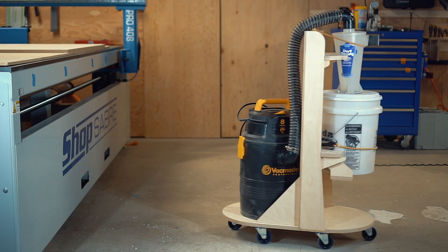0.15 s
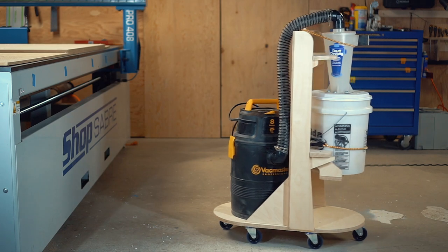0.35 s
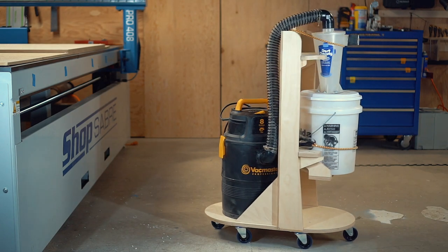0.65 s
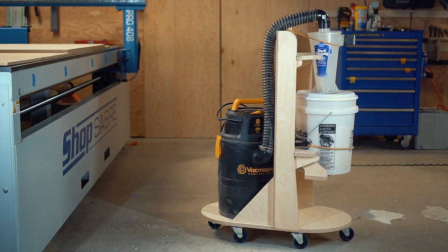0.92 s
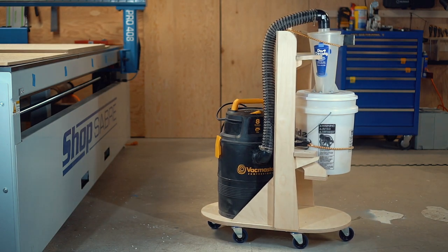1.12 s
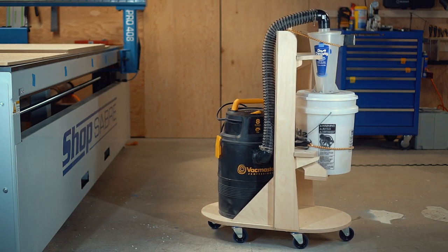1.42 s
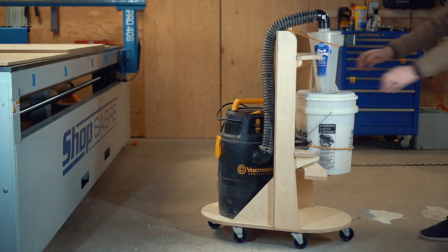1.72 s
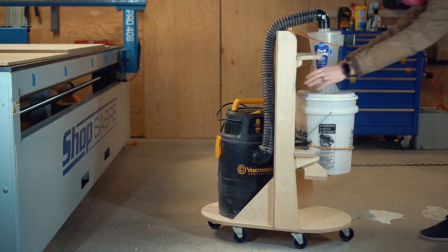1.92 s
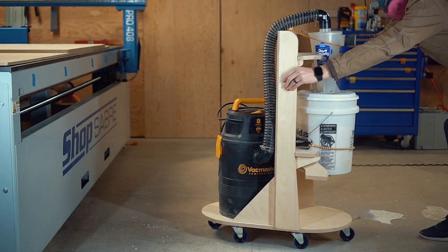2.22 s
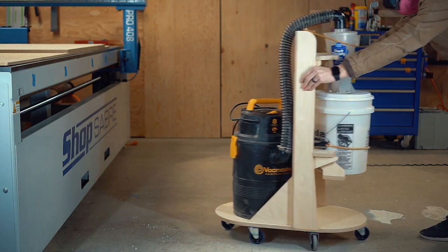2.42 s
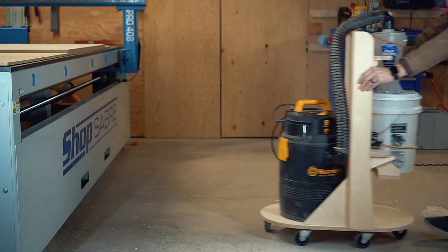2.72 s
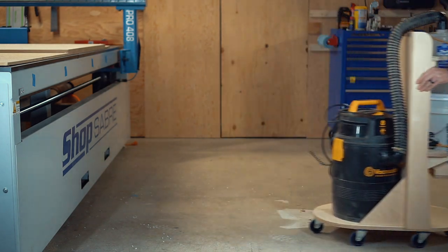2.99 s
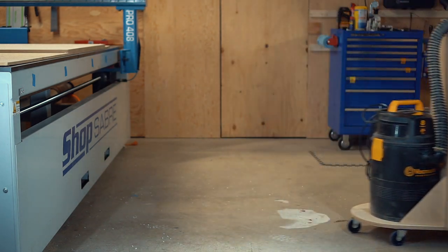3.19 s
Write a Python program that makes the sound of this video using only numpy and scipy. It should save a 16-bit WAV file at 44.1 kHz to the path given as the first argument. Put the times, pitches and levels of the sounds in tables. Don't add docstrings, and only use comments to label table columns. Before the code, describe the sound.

Hard cart wheels chatter on concrete, fall quiet, then jolt, clatter and rumble off

```python
import sys
import numpy as np
from scipy import signal
from scipy.fft import rfft, irfft, next_fast_len
from scipy.io import wavfile

SR = 44100
rng = np.random.default_rng(int(sys.argv[2]) if len(sys.argv) > 2 else 0)


def generate_wav(sig):
    pcm = np.round(np.clip(np.atleast_2d(sig).T, -1, 1) * 32767).astype(np.int16)
    wavfile.write(sys.argv[1], SR, pcm)


def gain_from_db(level_db):
    decades = np.asarray(level_db, float) / 20
    return 10 ** decades


N = 147735

# time in seconds, deck level in dB, then fork chatter and wheel scrub
# in dB against the deck.
COASTING = [
    (0, -35.5, -12, -48),
    (.07, -41, -9, -48),
    (.16, -39.5, -11, -48),
    (.33, -55, -7.5, -45),
    (.62, -51.5, -8.5, -33),
    (.74, -51, -2, -36),
    (1.0, -52, -4.5, -42),
    (2.12, -58, -6.5, -45),
    (2.18, -50, -8, -30),
]
TUGGED = [
    (2.24, -49, -18, -16),
    (2.27, -34.5, -8, -46),
    (2.48, -37, -7.5, -29),
    (2.495, -30, 2.5, -17.5),
    (2.6, -27.5, -5, -16.5),
    (2.63, -21, -6, -19),
    (2.69, -21.5, -5.5, -20),
    (2.72, -28.5, -1, -21),
    (2.84, -27, -3.5, -27),
]
ROLLING_AWAY = [
    (2.865, -24, -12, -37),
    (2.883, -22, -8.5, -37),
    (2.895, -21, -5.5, -26),
    (2.97, -22, -1, -24),
    (3.04, -21.5, -5.5, -41),
    (3.13, -23.5, -2.5, -35),
    (3.2, -29, 4.5, -28.5),
    (3.26, -25, 1, -34.5),
    (3.35, -30.5, 3.5, -22),
]
# time in seconds, fork level in dB, deck and crack levels in dB against the
CASTER_JOLTS = [(0.096, -41, -4, -14, 0.4), (0.101, -36, -7, -30, 0.12), (0.698, -34, -5.5, -6.5, 0.7),
                (0.7054, -36, -4, -30, 0.18), (2.2435, -42.5, 6, -40, 0.2), (2.2632, -31.5, 7.5, -36, 0.24),
                (2.3012, -35.5, 5, -30, .1), (2.3222, -32, 3, -10, 0.3), (2.3395, -35.5, 5, -20, 0.1),
                (2.411, -32, -3, -2, .9), (2.429, -40, 5, -6, .6), (2.4895, -24.5, -3, -19, 0.37),
                (2.521, -26, -5, 0, .4), (2.5724, -27, 7.5, -3, 0.2), (2.586, -27, 0, -20, 0.2),
                (2.6117, -22, -2, -10, 0.2), (2.6654, -12, -2, -7, 0.28), (2.892, -12.5, -14, -14, 0.54),
                (2.9272, -18, -10, -15, 0.34), (2.966, -10, -10, -19, 0.62), (3.0712, -21, -12, -8, 0.3),
                (3.0867, -15, -5.5, -24, 0.43), (3.1525, -20.5, 0, -20, 0.2),
                (3.1915, -12, -4.5, -24, 0.45), (3.2275, -7, -14, -30, .7), (3.244, -20, -8, -25, .4),
                (3.3179, -20.5, -13, -30, 0.13)]
# time in seconds, peak in dB, pitch in Hz,
# # 60 dB decay in seconds.
CART_RINGS = [(0.096, -50, 6900, .03), (.099, -40, 1156, 0.085), (.1, -45, 1770, 0.037),
              (.099, -46, 2330, .04), (.096, -53, 4900, .03), (.112, -48, 3570, 0.036),
              (.703, -34, 340, 0.12), (1.12, -54.5, 1010, 5.5), (.697, -42, 6770, 0.033),
              (.699, -48, 3570, 0.08), (.714, -44, 3575, .06), (.703, -45, 2280, .05),
              (.704, -43, 1300, .05), (.7, -46, 2880, 0.046), (.82, -61, 3570, .15), (.82, -56, 2500, .05),
              (0.721, -44, 2500, 0.061), (1.713, -44, 9900, .02), (2.26, -39.5, 2580, 0.07),
              (2.279, -43.5, 2570, 0.11), (2.302, -29, 746, 0.068), (2.332, -41, 2570, .1),
              (2.358, -44, 2560, .1), (2.383, -44, 2540, .1), (2.433, -36, 1150, .06),
              (2.52, -42, 12900, .03), (3.11, -24, 440, .15), (2.313, -54, 7300, .02),
              (2.32, -49, 4050, 0.027), (2.412, -45, 3750, .04), (2.429, -46, 4700, .012),
              (2.261, -19.5, 398, 0.035), (2.322, -37, 2400, 0.053), (2.41, -40, 7590, .035),
              (2.178, -34.5, 558, 0.16), (2.493, -32.5, 6050, 0.052), (2.492, -28, 2330, .06),
              (2.562, -38, 6050, .05), (2.586, -41, 6050, .08), (2.663, -39, 6000, .04),
              (2.493, -36, 7590, 0.063), (2.519, -31.5, 6050, 0.043), (2.63, -23, 722.6, 0.28),
              (2.663, -19, 444.3, 0.19), (2.868, -16, 325.6, 0.31), (2.892, -29, 7600, 0.02),
              (2.891, -31, 8230, 0.019), (2.983, -28, 3750, 0.035), (3.157, -40, 7750, .04),
              (3.189, -41, 7600, .03), (3.191, -19, 2390, 0.039), (3.226, -14.5, 2530, 0.03),
              (3.315, -25, 1540, 0.043)]
# time in seconds, peak in dB.
HANDLE_SHAKES = [(2.52, -41), (2.572, -35), (2.615, -32), (2.638, -34), (2.678, -35), (2.854, -49),
                 (2.886, -37), (2.926, -40), (2.95, -42), (3.014, -50), (3.08, -49), (3.094, -48),
                 (3.109, -40), (3.148, -45), (3.158, -46), (3.174, -42), (3.194, -39), (3.212, -48),
                 (3.24, -50), (3.28, -49.5), (3.324, -47)]

# centre in Hz, width in Hz, level in dB.
DECK_MODES = [(307.5, 36.7, -1.5), (348.7, 34.2, 2), (387, 84.5, -2.5), (439, 26.4, 1), (482.6, 19, -1),
              (540.7, 33.6, -2), (622, 70.5, -3.5), (735, 69, -3), (900, 97, -12.5)]
# centre in Hz, width in Hz, level in dB.
FORK_MODES = [(1030, 118, 4.5), (1318, 179, 2), (1570, 187, 2), (1850, 143, 0), (1970, 200, -2),
              (2414, 606, -6), (3065, 370, -8.5), (3740, 770, -16), (4890, 700, -18)]
# centre in Hz, width in Hz, level in dB.
RACE_MODES = [(3680, 430, -2.5), (6050, 200, -3), (10500, 700, -10)]
# centre in Hz, width in Hz, level in dB.
HANDLE_MODES = [(7600, 330, -6), (10200, 500, 0.5), (11200, 600, -4), (12900, 400, -14), (14900, 600, -11)]
# centre in Hz, width in Hz, rms level in dB.
HUM_BANDS = [(116.45, 6.4, -51)]

# frequency in Hz, density in dB per Hz.
SCRUB_COLOUR = [(1760, -41), (3000, -1.5), (4070, 6.5), (5150, -3), (5950, 4), (8800, -5), (10900, -6),
                (12900, -11), (13800, -18), (15700, -24)]
# frequency in Hz, density in dB per Hz.
SWISH_COLOUR = [(1500, -0.5), (3500, -4), (5500, -0.5), (7000, -2.5), (9000, -9), (12500, -8.5),
                (15500, -16)]
# frequency in Hz, density in dB per Hz.
AIR_COLOUR = [(45, -18.5), (85, -4), (140, -4), (285, -10.5), (600, -18), (1500, -27.5), (3500, -36.5),
              (15700, -44.5)]
# frequency in Hz, likeness from 0 to 1.
SIDES_ALIKE = [(60, 1), (250, .99), (500, .95), (1000, 0.6), (2000, 0.36), (4000, 0.1), (8000, 0.36),
               (14000, 0.1)]
# frequency in Hz, left minus right in dB.
CART_LEAN = [(250, -8), (500, 56), (2000, 16), (4000, 6), (8000, 2.5), (12000, 14)]

GRIT_PER_S, GRIT_SPREAD_DB = 1500, 1.5
BUMP_DB, BUMP_PER_S = 0.5, 23
JOLT_S, THUD_S, CRACK_S = .004, .006, .004
STRIKE = 7.5
RING_RISE_S, RING_ROUGH = .001, 0.32
RACE_DB = -8.5
HANDLE_S, HANDLE_DB = 0.0076, 6
SWISH_S, SWISH_RISE_S, SWISH_FALL_S, SWISH_DB = 1.726, 0.092, 0.16, -51
SHOP_T60_S, WALL_CUT_HZ, SHOP_DB = .45, 7000, -14
AIR_DB = -45
FAN_HZ, FAN_DB, FAN_FADE_DB_PER_S = 57.6, -45.5, 1
DUCK_S, DUCK_RAMP_S, DUCK_DB = 2.67, 0.071, -1.5


def rms_one(x):
    return x / np.sqrt(np.mean(x ** 2) + 1e-20)


def at_hz(points, hz):
    table_hz, values = np.transpose(points)
    return np.interp(np.log(hz), np.log(table_hz), values)


def drift(rate):
    r = np.exp(-80 * np.pi * rate / SR)
    noise = rng.standard_normal(N // 40 + 2002)
    slow = rms_one(signal.lfilter([1], [1, -2 * r, r * r], noise)[2000:])
    return np.interp(np.arange(N) / 40, np.arange(len(slow)), slow)


def butter(x, order, hz, kind="low"):
    return signal.sosfilt(signal.butter(order, hz, kind, fs=SR, output="sos"), x)


def resonate(x, hz, width_hz):
    r = np.exp(-np.pi * width_hz / SR)
    feedback = [1, -2 * r * np.cos(2 * np.pi * hz / SR), r * r]
    return signal.lfilter([(1 - r * r) / 2, 0, (r * r - 1) / 2], feedback, x + 1e-18)


def body(x, modes):
    return sum((-1) ** k * gain_from_db(db) * resonate(x, hz, w) for k, (hz, w, db) in enumerate(modes))


def stereo(mid, side, colour, lean):
    hz = np.maximum(np.arange(N // 2 + 1) * SR / N, 10)
    alike = np.clip(at_hz(SIDES_ALIKE, hz), 0, 1)
    pan_db = lean * at_hz(CART_LEAN, hz) / 2
    m = rfft(mid) * np.sqrt(1 + alike)
    s = rfft(side) * np.sqrt(1 - alike)
    sides = np.array([(m + s) * gain_from_db(pan_db), (m - s) * gain_from_db(-pan_db)])
    return irfft(gain_from_db(at_hz(colour, hz)) * sides, N)


def burst(s, db, fade_s):
    starts = np.zeros(N)
    starts[(np.asarray(s) * SR).astype(int)] = gain_from_db(db)
    return signal.lfilter([1], [1, -np.exp(-1 / (fade_s * SR))], starts + 1e-18)


def grit(share):
    sizes = gain_from_db(GRIT_SPREAD_DB * np.minimum(rng.exponential(1, N), 5)) * rng.choice([-1, 1], N)
    knocks = sizes * (rng.random(N) < share * GRIT_PER_S / SR)
    return rms_one(knocks) * gain_from_db(BUMP_DB * drift(BUMP_PER_S))


def rolling():
    s, *levels = np.transpose(list(COASTING) + list(TUGGED) + list(ROLLING_AWAY))
    load, chatter, scrub = (np.interp(np.arange(N) / SR, s, level) for level in levels)
    deck = rms_one(butter(body(grit(.6), DECK_MODES), 2, 260, "high"))
    fork = rms_one(butter(body(grit(.9), FORK_MODES), 2, 5200))
    flicker = gain_from_db(2.0 * drift(76))
    wheels = rms_one(stereo(grit(7.3), grit(2.0), SCRUB_COLOUR, lean=0.63)) * flicker
    races = gain_from_db(RACE_DB + 5.4 * drift(27)) * rms_one(body(grit(0.31), RACE_MODES))
    cart = gain_from_db(load - 1.5) * deck + gain_from_db(load + chatter - 2.5) * fork
    return cart, gain_from_db(load + scrub + 4.5) * (wheels + races)


def jolts():
    s, db, deck_db, crack_db, hard = np.transpose(CASTER_JOLTS)
    white = rng.standard_normal((4, N))
    white[:2, (s * SR).astype(int)] = -STRIKE
    hardness = np.clip(np.interp(np.arange(N) / SR, s, hard), 0, 1)
    contacts = white[0] - np.roll(white[0], 1) * hardness
    fork = butter(body(contacts * burst(s, db + 10.5, JOLT_S), FORK_MODES), 2, 6500)
    deck = body(white[1] * burst(s, db + deck_db + 19.5, THUD_S), DECK_MODES)
    crack = burst(s, db + crack_db - 8.0, CRACK_S)
    return fork + deck, stereo(white[2] * crack, white[3] * crack, SCRUB_COLOUR, lean=0.77)


def ticks():
    out, t = np.zeros(N + SR), np.arange(SR // 4) / SR
    chances = rng.uniform(0.53, 1, (len(CART_RINGS), 2))
    for (s, db, hz, t60), (apart, turn) in zip(CART_RINGS, chances):
        second_hz = hz * (1 + 0.019 * apart)
        pair = np.sin(2 * np.pi * hz * t) + 0.2 * np.sin(2 * np.pi * (second_hz * t + turn))
        decay = gain_from_db(db - 60 * t / t60) * (1 - np.exp(-t / RING_RISE_S))
        start = int(s * SR)
        out[start:start + len(t)] += decay * pair
    return out[:N] * (1 + RING_ROUGH * drift(87))


def handle():
    s, db = np.transpose(HANDLE_SHAKES)
    buzz = body(grit(3.0) * burst(s, db + HANDLE_DB, HANDLE_S), HANDLE_MODES)
    return buzz * gain_from_db(np.array([[1.7], [-1.7]]))


def swish():
    t = np.arange(N) / SR - SWISH_S
    swell = np.exp(np.where(t < 0, t / SWISH_RISE_S, -t / SWISH_FALL_S)) * gain_from_db(1.2 * drift(25))
    cloth = rms_one(stereo(*rng.standard_normal((2, N)), SWISH_COLOUR, lean=0))
    return gain_from_db(SWISH_DB) * swell * cloth


def shop(x):
    size = next_fast_len(N + SR)
    w = 2 * np.pi * np.arange(size // 2 + 1) / size
    dull = np.exp(-2 * np.pi * WALL_CUT_HZ / SR)
    wall = (1 - dull) / (1 - dull * np.exp(-1j * w))
    out = np.zeros((2, len(w)), complex)
    for k, lag in enumerate((rng.uniform(.015, .05, size=16) * SR).astype(int)):
        loop = gain_from_db(-60 * lag / SR / SHOP_T60_S) * wall * np.exp(-1j * w * lag)
        out[k % 2] += loop / (1 - loop) * (-1) ** (k // 2)
    hz = np.maximum(w * SR / (2 * np.pi), 10)
    apart = np.sqrt(np.clip(1 - at_hz(SIDES_ALIKE, hz), 0, 1)) * 1.34
    mid, side = (out[0] + out[1]) / 2, (out[0] - out[1]) / 2 * apart
    return irfft(rfft(x, size) * np.array([mid + side, mid - side]), size)[:, :N]


def air():
    noise = rms_one(stereo(*rng.standard_normal((2, N)), AIR_COLOUR, lean=0.037))
    noise = noise * gain_from_db(AIR_DB + 0.18 * drift(9.2))
    fan_level = gain_from_db(FAN_DB - FAN_FADE_DB_PER_S * np.arange(N) / SR + 2.0 * drift(2.0))
    fan = fan_level * np.sin(2 * np.pi * np.cumsum(FAN_HZ + 1.26 * drift(3)) / SR)
    hum = np.zeros(N)
    for hz, width_hz, db in HUM_BANDS:
        narrow = resonate(resonate(rng.standard_normal(2 * N), hz, width_hz), hz, width_hz)
        hum += gain_from_db(db) * rms_one(narrow[N:])
    return noise + fan + hum


def scene():
    cart, wheels = rolling()
    knock, crack = jolts()
    cart = butter(cart + knock + ticks(), 4, 230, "high")
    wheels = wheels + crack + handle()
    echo = gain_from_db(SHOP_DB) * shop(cart + wheels.mean(axis=0))
    duck = gain_from_db(DUCK_DB * np.clip((np.arange(N) / SR - DUCK_S) / DUCK_RAMP_S, 0, 1))
    return cart * gain_from_db(np.array([[.3], [-.3]])) + wheels + echo + swish() + air() * duck


def top_cut(x):
    return signal.sosfilt(signal.butter(12, 15830, fs=SR, output="sos"), x)


def record(dry):
    rounded = .55 * np.tanh(dry / .55)
    topped = signal.sosfilt(signal.ellip(10, .3, 60, 15800, fs=SR, output="sos"), rounded)
    return top_cut(butter(topped, 8, 47, "high"))


dry = scene()
out = record(dry)
generate_wav(out)
```